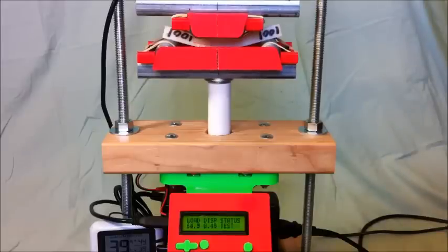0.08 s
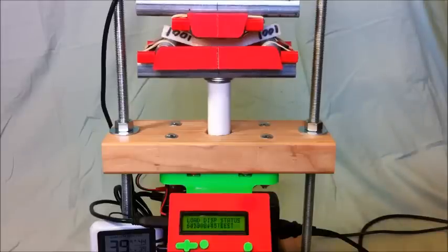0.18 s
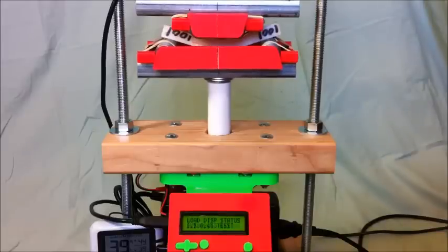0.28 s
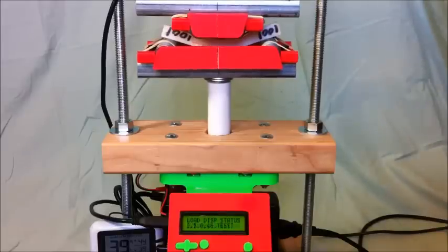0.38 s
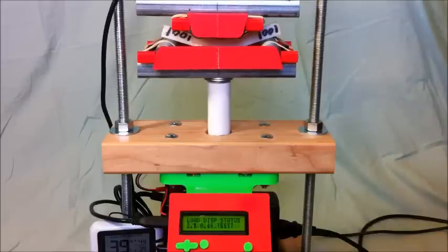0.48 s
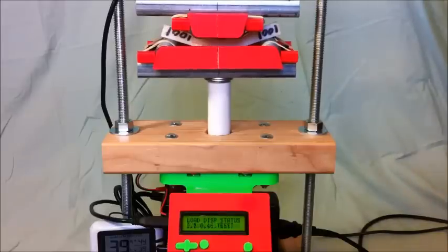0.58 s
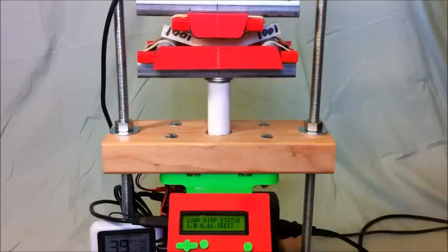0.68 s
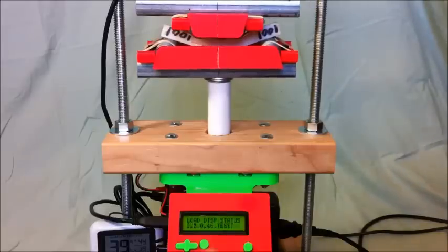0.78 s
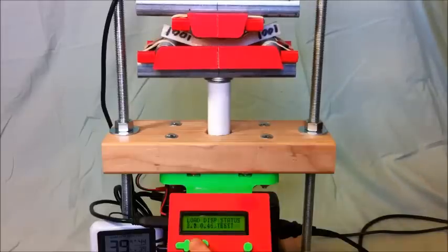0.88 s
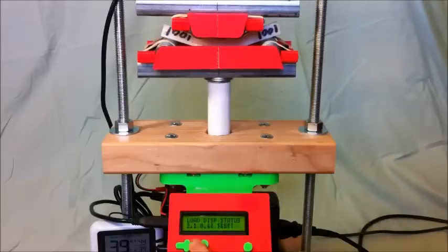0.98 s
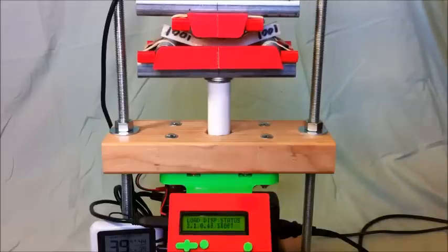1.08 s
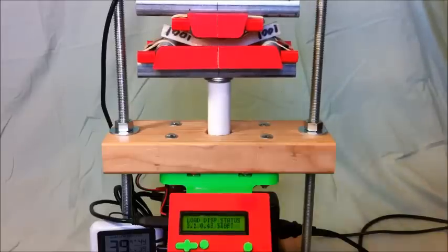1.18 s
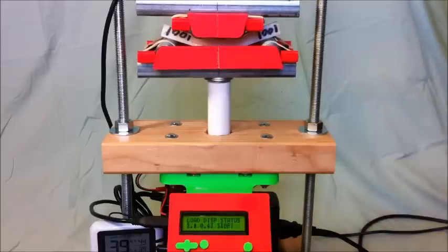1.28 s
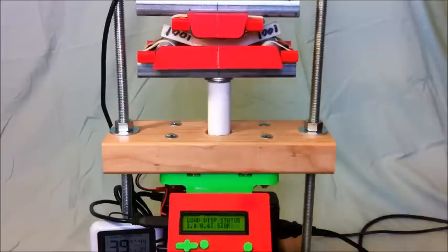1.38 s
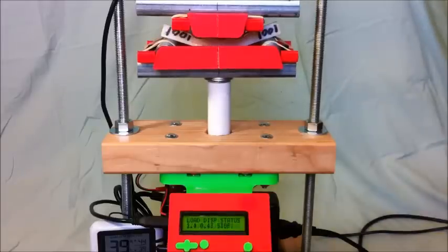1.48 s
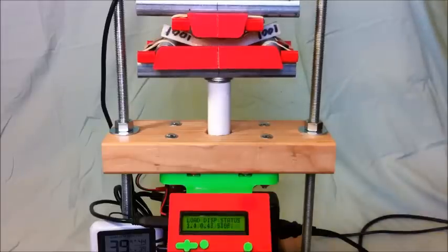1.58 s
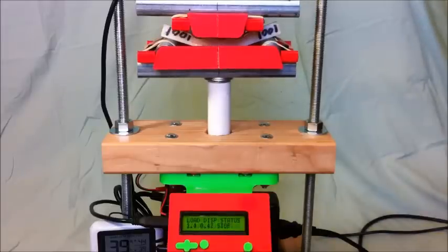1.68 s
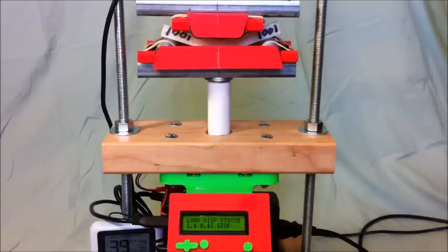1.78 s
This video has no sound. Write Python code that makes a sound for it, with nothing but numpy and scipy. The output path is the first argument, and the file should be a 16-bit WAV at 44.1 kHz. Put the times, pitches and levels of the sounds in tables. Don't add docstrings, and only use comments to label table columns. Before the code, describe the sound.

Loud dry snap of breaking plastic amid steady motor buzz and gear rattle, then only quiet fan whine

```python
import sys
import numpy as np
from scipy import signal
from scipy.fft import rfft, irfft
from scipy.io import wavfile
from scipy.ndimage import uniform_filter1d

SR = 44100
rng = np.random.default_rng(int(sys.argv[2]) if len(sys.argv) > 2 else 0)


def linear_from_db(decibels):
    return 10 ** (np.asarray(decibels, float) / 20)


def to_wav(s):
    ch = np.atleast_2d(s).T
    pcm = np.round(np.clip(ch, -1, 1) * 32767)
    wavfile.write(sys.argv[1], SR, pcm.astype(np.int16))


N = 79380
CRACK_S, STOP_S = .2285, 1.017


def level(x):
    return x / np.sqrt(np.mean(x ** 2))


def run_level(x, times):
    first, last = int(times.min() * SR), int(times.max() * SR)
    return x / np.sqrt(np.mean(x[first:last] ** 2))


def band(x, hz, width):
    return signal.lfilter(*signal.iirpeak(hz, hz / width, fs=SR), x)


def bands(x, table):
    return sum(linear_from_db(db) * band(x, hz, width) for hz, width, db in table)


def mode(x, hz, t60):
    p = np.exp(2j * np.pi * hz / SR - np.log(1000) / (t60 * SR))
    return signal.lfilter([1], [1, -p], x).imag


def colour(x, hz, db, size=4096):
    f = np.maximum(np.arange(size // 2 + 1) * SR / size, 1)
    cepstrum = irfft(np.interp(np.log(f), np.log(hz), db) * np.log(10) / 20)
    cepstrum[1:size // 2] *= 2
    cepstrum[size // 2 + 1:] = 0
    impulse = irfft(np.exp(rfft(cepstrum)))
    return signal.fftconvolve(x, impulse)[:N]


def walk(rate):
    k = int(SR / rate)
    held = np.repeat(rng.standard_normal(N // k + 1), k)
    return 1.18 * uniform_filter1d(uniform_filter1d(held, k), k)[:N]


def steps(times, jitter_s, scatter_db):
    chance = rng.standard_normal((len(times), 2))
    at = np.clip((times + jitter_s * chance[:, 0]) * SR, 0, N - 2)
    force = linear_from_db(scatter_db * chance[:, 1])
    x, i = np.zeros(N), at.astype(int)
    np.add.at(x, i, force * (1 - at + i))
    np.add.at(x, i + 1, force * (at - i))
    return x


def decay(x, tau):
    return signal.lfilter([1], [1, -np.exp(-1 / (tau * SR))], x)


def spread(x, lags=(13, 31), g=.5):
    for lag in lags:
        a = np.zeros(lag + 1)
        a[0], a[-1] = 1, -g
        x = signal.lfilter(a[::-1], a, x)
    return x


# (time [s], frequency [Hz])
FAN_PITCH = [(0, 8601), (.45, 8604), (1.0, 8634), (1.2, 8585), (1.4, 8558), (1.8, 8546)]
# (multiple, level [dB])
BLADE_TONES = [(1, -23), (2, -22), (4, -21.5), (5, -12), (7, -16.5), (9, -18), (10, -11.5), (11, -32),
               (12, -14), (15, -2.5), (16, -15.5), (20, -25)]
# (time [s], level [dB])
WHINE_LEVEL = [(0, -53), (1.0, -51.5), (1.15, -55), (1.3, -52.5), (1.8, -52)]


def fan_whine(t):
    blade_hz = np.interp(t, *np.array(FAN_PITCH).T) / 15 * (1 + .0004 * walk(40))
    phase = 2 * np.pi * np.cumsum(blade_hz) / SR
    tone = 0
    for k, db in BLADE_TONES:
        tone = tone + linear_from_db(db + 2.0 * walk(24.74)) * np.sin(k * phase + rng.uniform(0, 6))
    return 1.126 * linear_from_db(np.interp(t, *np.array(WHINE_LEVEL).T)) * tone


# (frequency [Hz], level [dB per Hz])
AIR_COLOUR = [(300, -20.5), (600, -13.5), (2000, -11.5), (3600, -2.5), (5200, -9), (7500, -10),
              (8400, -3.5), (9600, -13), (15500, -19)]


def fan_air():
    flicker = linear_from_db(0.98 * walk(29.7))
    air = flicker * level(colour(rng.standard_normal(N), *np.array(AIR_COLOUR).T))
    return linear_from_db(-56) * .85 * (air + .45 * np.roll(air, 97) + .3 * np.roll(air, 241))


def rumble():
    low = signal.butter(5, 86.6, fs=SR, output="sos")
    return linear_from_db(-86.5) * level(signal.sosfilt(low, rng.standard_normal(N)))


def shake(t):
    return linear_from_db(-86) * level(band(rng.standard_normal(N), 297, 120)) * (t < STOP_S)


def hum(x, rate, orders):
    k, db = np.array(orders).T
    hz = np.append(k * rate, [4200, 6000])
    x = spread(colour(x, hz, np.append(db, [-26, -50])), (11, 29, 67), .6)
    return x + .5 * walk(14) * spread(x, (97, 211), .6)


# (centre [Hz], width [Hz], level [dB])
GEAR_RATTLE = [(1796, 580, -3), (2636, 290, -4), (3930, 2150, -0.5), (6460, 660, -2.5), (8600, 3000, -4.5),
               (10520, 1540, -1), (14700, 1100, -8)]


def rattle(times):
    out = 0
    for hz, width, db in GEAR_RATTLE:
        contact = decay(steps(times, .0004, 2.5), 0.0015) + 0.29
        puff = contact * rng.standard_normal(N)
        out = out + linear_from_db(db) * level(band(band(puff, hz, width), hz, 2.45 * width))
    return out


# (multiple of the step rate, level [dB])
LOADED_HUM = [(1, -40), (2, -40), (3, -29), (4, -14), (5, -12), (6, -15), (7, -9), (8, -13), (9, -9),
              (10, 0), (11, -19), (12, -5), (13, -11), (14, -15), (15, -17), (16, -15), (17, -17),
              (18, -14), (19, -1), (20, -10), (21, -3), (22, -4), (23, -10), (24, -13), (25, -13),
              (26, -18), (27, -18), (28, -9), (29, -20), (30, -14)]
# (centre [Hz], width [Hz], level [dB])
LOADED_KNOCK = [(3300, 180, -19), (4060, 170, 4), (5220, 130, -2), (5870, 200, -28)]


def loaded_motor(t):
    rate_hz, last_s = 120.15, .2208
    times = last_s - np.arange(int(last_s * rate_hz) + 1) / rate_hz
    knock = run_level(bands(steps(times, .00002, 1.2), LOADED_KNOCK), times)
    buzz = run_level(hum(steps(times, .00001, 1.0), rate_hz, LOADED_HUM), times)
    out = linear_from_db(-48) * buzz + linear_from_db(-54 + 2.0 * walk(8.3)) * knock
    return out + linear_from_db(-56.5) * run_level(rattle(times), times) * (t < CRACK_S)


# (time after the crack [s], level [dB])
SLIP_HITS = [
    (0, -5.5),
    (.0004, -0.5),
    (.001, -1.5),
    (.002, -4.5),
    (.006, -14),
    (.013, -16.5),
]


def slips():
    return sum(linear_from_db(db) * steps(np.array([CRACK_S + s]), 0, 0) for s, db in SLIP_HITS)


# (frequency [Hz], level [dB], t60 [s])
CRACK_MODES = [(854, -4.5, .04), (1360, -14, 0.015), (1504, -7, 0.092), (1770, -16, 0.024),
               (2257, -0.5, 0.021), (5500, -11.5, 0.018), (9520, 0, 0.01), (12200, 13, 0.011)]
# (frequency [Hz], level [dB per Hz])
SNAP_COLOUR = [(180, -24), (300, -27), (1460, -0.5), (1870, -11), (5800, -16), (6410, -10), (8360, -17),
               (12300, -5.5), (16000, -11.5)]


def crack(hit):
    body = sum(linear_from_db(db) * mode(hit, hz, t60) for hz, db, t60 in CRACK_MODES)
    envelope = linear_from_db(-21) * decay(hit, 0.00081) + linear_from_db(-34) * decay(hit, 0.0086)
    snap = envelope * level(colour(rng.standard_normal(N), *np.array(SNAP_COLOUR).T))
    return linear_from_db(-27) * body + snap


def thud(hit):
    return linear_from_db(-53.5) * mode(hit, 144, 0.014)


# (frequency [Hz], t60 [s], level [dB])
CASE_MODES = [(2611, .05, 0), (2742, .035, -7), (1490, .03, -12)]


def case_ring(t, times):
    hits = steps(times, .00005, 2.2)
    ring = sum(linear_from_db(db) * level(mode(hits, hz, t60)) for hz, t60, db in CASE_MODES)
    return run_level(ring, times) * np.interp(t, [0.314, 0.354], [.45, 1])


# (multiple of the step rate, level [dB])
FREE_HUM = [(1, -50), (2, -46), (3, -34), (4, -15), (5, -14), (6, -32), (7, -8), (8, -29), (9, -7),
            (10, -9), (11, -10), (12, -9), (13, -15), (14, -13), (15, -16), (16, -9), (17, -10), (18, -18),
            (19, -20), (20, -16), (21, -16), (22, -16), (23, -17), (24, -18), (25, -24), (26, -26),
            (27, -19), (28, -20), (29, -22), (30, -22)]
# (centre [Hz], width [Hz], level [dB])
FREE_GEARS = [(3920, 130, -1), (4320, 83, 10), (4900, 210, -9), (5300, 340, -1)]
# (time [s], frame hum [dB], case ring [dB], rattle [dB])
FREE_RUN = [
    [(0.27, -52, -57.5, -65), (0.444, -51.5, -52.5, -61), (0.482, -51.5, -42, -61.5),
     (0.514, -50, -57, -61), (0.55, -49, -52, -57), (0.586, -46.5, -45, -59.5), (0.614, -51, -51.5, -61),
     (0.656, -48.5, -49, -59.5), (0.73, -47, -51, -60)],
    [(0.745, -49, -47.5, -58), (0.787, -45.5, -40, -46.5), (0.839, -45.5, -38, -53),
     (0.873, -47.5, -52, -54.5), (0.897, -47.5, -44, -59.5), (0.953, -45.5, -68, -57.5),
     (0.983, -48, -36, -44.5), (1.009, -45, -44.5, -53.5), (1.02, -49, -39.5, -50.5)],
]


def free_motor(t):
    rate_hz, step_s = 124.03, .2702
    times = step_s + np.arange(-4, int((STOP_S - step_s) * rate_hz) + 1) / rate_hz
    s, hum_db, ring_db, rattle_db = np.concatenate(FREE_RUN).T
    running = np.clip((STOP_S + 0.0084 - t) / 0.0073, 0, 1) * (t > CRACK_S)
    knock = run_level(spread(bands(steps(times, .00001, 2.0), FREE_GEARS)), times)
    ring = case_ring(t, times)
    buzz = run_level(hum(steps(times, .00001, 0.88), rate_hz, FREE_HUM), times)
    out = linear_from_db(-0.16 + np.interp(t, s, hum_db)) * (buzz + linear_from_db(-8.5) * knock)
    out = out + linear_from_db(np.interp(t, s, ring_db)) * ring
    return out + linear_from_db(7.5 + np.interp(t, s, rattle_db)) * running * run_level(rattle(times), times)


# (time [s], level [dB], low edge [Hz], high edge [Hz])
SETTLING = [
    (1.058, -38.5, 2500, 6000),
    (1.368, -38.5, 900, 2800),
    (1.368, -42, 11000, 15700),
    (1.556, -39, 9000, 11500),
    (1.556, -38.5, 4500, 7460),
]


def ticks():
    out = 0
    for s, db, low_hz, high_hz in SETTLING:
        click = decay(steps(np.array([s]), 0, 0), 0.0024) * rng.standard_normal(N)
        edges = signal.butter(2, [low_hz, high_hz], "band", fs=SR, output="sos")
        out = out + linear_from_db(db) * signal.sosfilt(edges, click)
    return out


def scene():
    t = np.arange(N) / SR
    fan = fan_whine(t) + fan_air()
    low = rumble()
    hit = slips()
    snap = crack(hit)
    low = low + shake(t) + thud(hit)
    motor = loaded_motor(t) + free_motor(t)
    duck = linear_from_db(-47 * ((t > CRACK_S - 0.0043) & (t < CRACK_S)))
    bass_cut = signal.butter(5, 380, "high", fs=SR, output="sos")
    near = signal.sosfilt(bass_cut, (motor + fan) * duck + ticks() + snap)
    return (near + low)[None]


def roll_off(x):
    return signal.sosfilt(signal.butter(12, 16370, fs=SR, output="sos"), x)


def record(dry):
    top_cut = signal.ellip(14, .3, 70, 15790, fs=SR, output="sos")
    mix = signal.sosfilt(top_cut, dry)
    return roll_off(mix)


dry = scene()
out = record(dry)
to_wav(out)
```